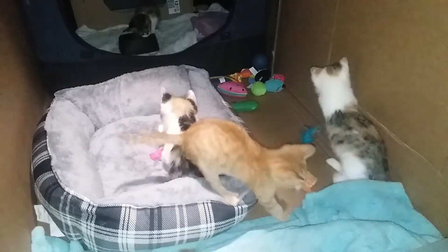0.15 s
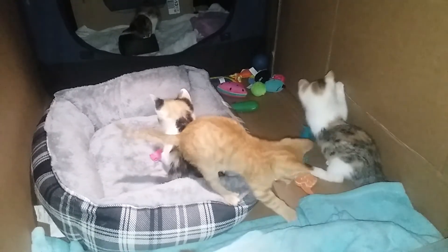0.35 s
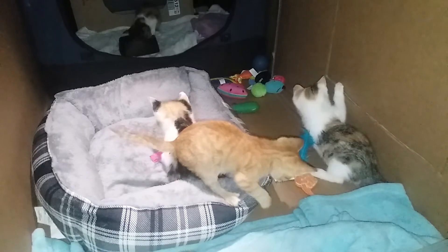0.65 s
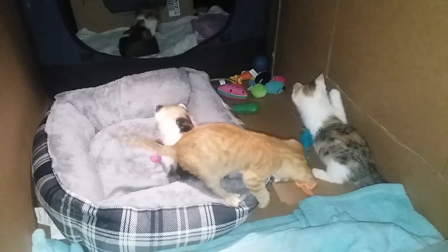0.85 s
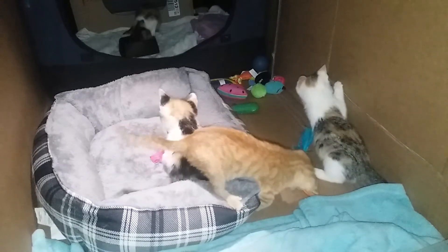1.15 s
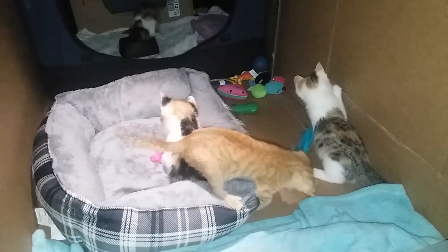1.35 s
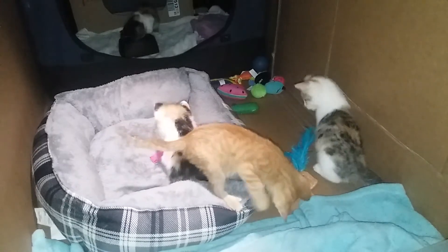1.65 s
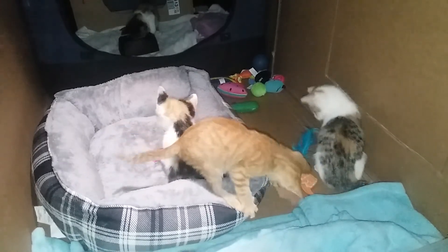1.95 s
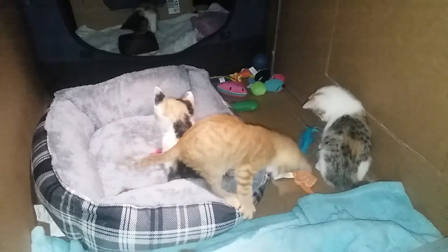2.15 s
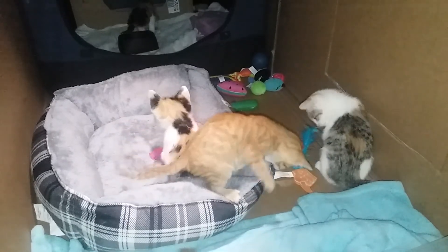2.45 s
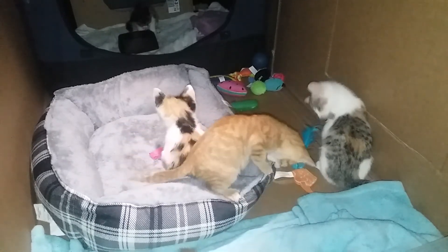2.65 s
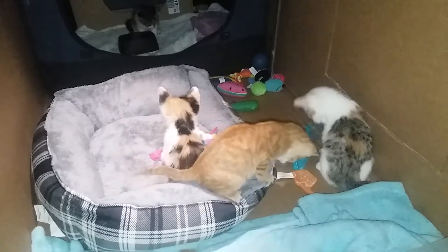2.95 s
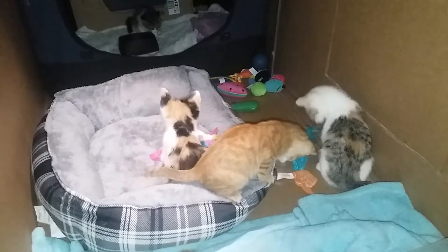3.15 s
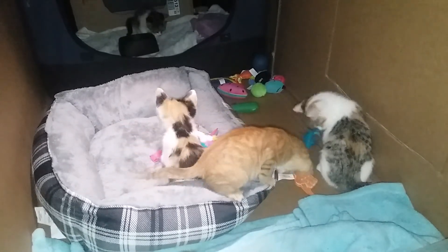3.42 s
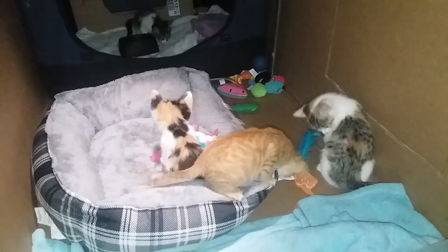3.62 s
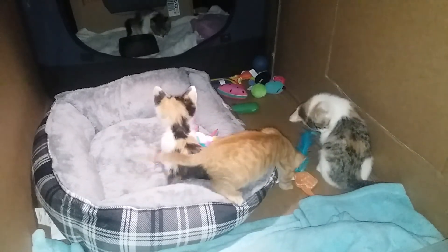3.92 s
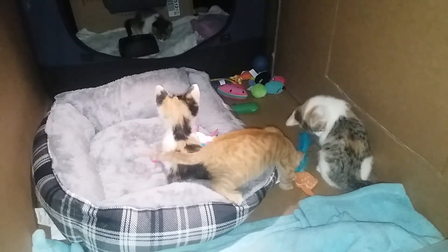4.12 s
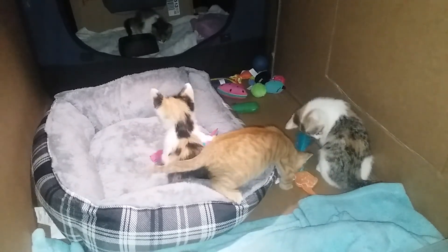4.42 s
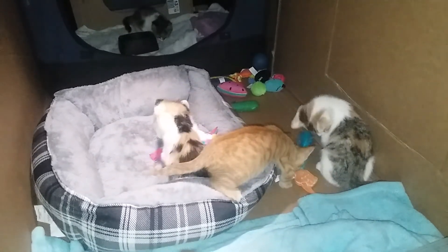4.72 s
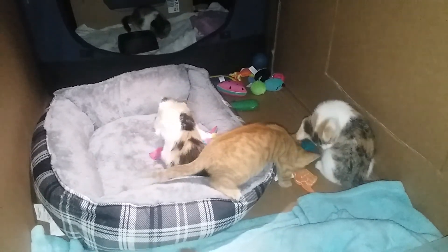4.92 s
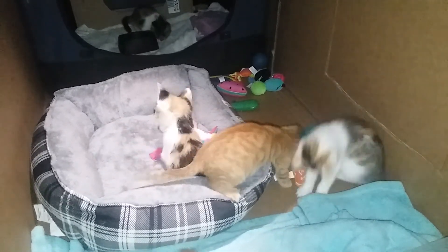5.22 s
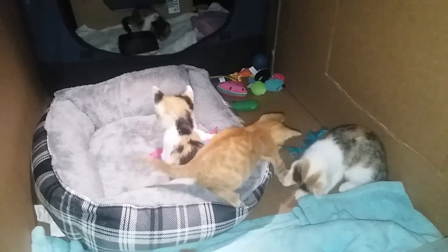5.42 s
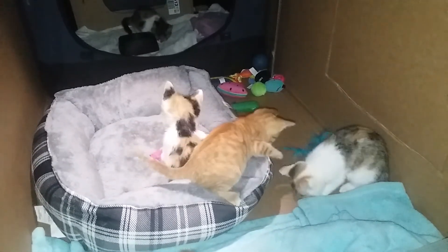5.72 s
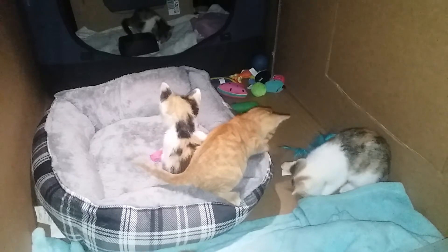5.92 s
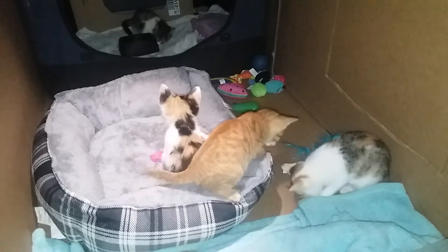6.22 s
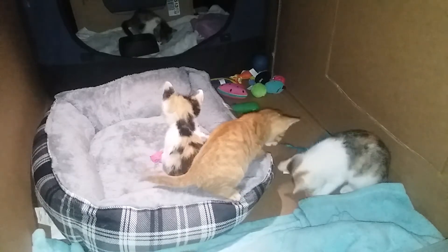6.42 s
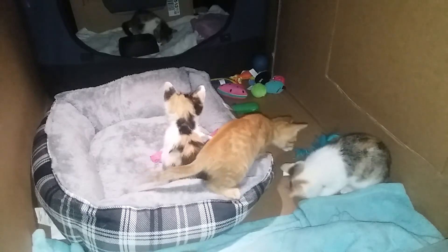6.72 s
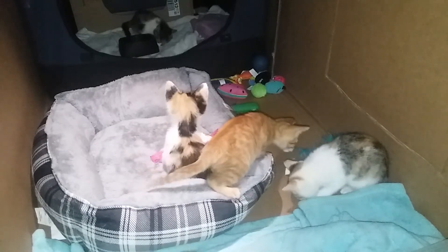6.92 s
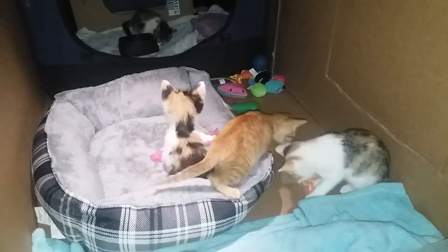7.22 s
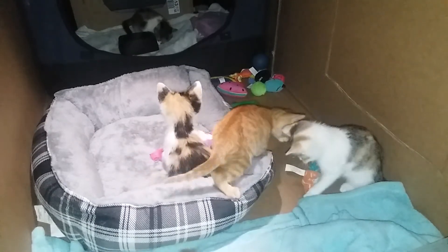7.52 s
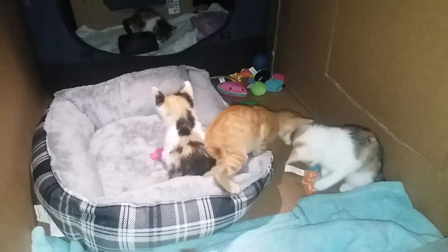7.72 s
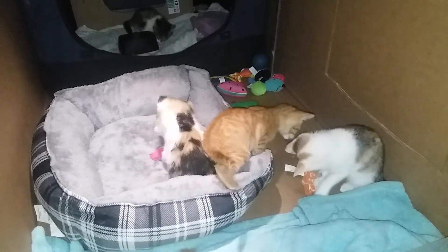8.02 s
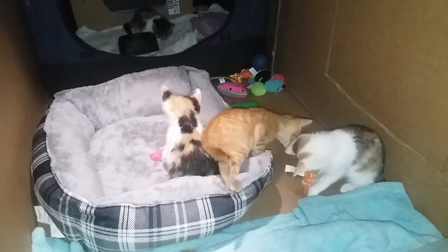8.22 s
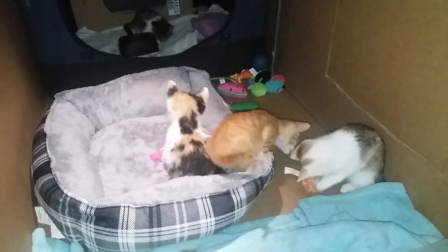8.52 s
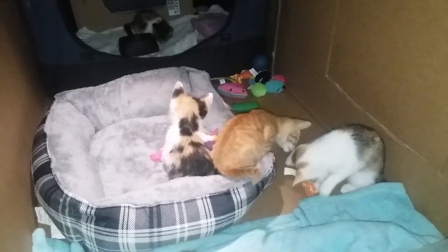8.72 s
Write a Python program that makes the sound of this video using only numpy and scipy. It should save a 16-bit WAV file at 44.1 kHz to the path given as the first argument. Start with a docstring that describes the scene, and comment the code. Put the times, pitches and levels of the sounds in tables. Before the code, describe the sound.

Close, sparse knocks and scratchy claw sounds on cardboard, with faint plush rustling between them, above a soft low motor hum.

```python
"""Kittens play in a cardboard box with a plush bed, close to a phone in a small, quiet room.
Throughout, motor and mains tones hum over rushing air, and chance touches tick. Early, paws strike the
panel into decaying oscillation and claws scrape by stick-slip; then fur brushes plush among lighter knocks.
From about 5 s bodies rub the cardboard, ticks cluster before 7 s, and firm thumps return after 7.7 s.
Box walls and room add brief reflections."""
import sys
import numpy as np
from scipy import signal
from scipy.fft import rfft, irfft, next_fast_len
from scipy.io import wavfile

SR = 44100
rng = np.random.default_rng(int(sys.argv[2]) if len(sys.argv) > 2 else 0)


def int16_out(signal):
    """Quantize to a 16-bit WAV file."""
    q = np.round(np.clip(np.atleast_2d(signal).T, -1, 1) * 32767)
    wavfile.write(sys.argv[1], SR, q.astype(np.int16))


N = 390726

# Levels are relative: the layers apply further gains, and each colour is normalised in power.
# hum lines of motor and mains [f/Hz, rms level/dB, waver/dB]
HUM_LINES = [(59.2, -74.5, 1), (71.2, -55.5, 0.4), (110.3, -62, 4), (117.4, -69, 2.5), (119.5, -59, 2),
             (160.8, -67, 4.5), (178.2, -74, 2), (237, -69.5, 3), (364, -81, 1), (417, -83, 4.5)]
# colour of the room's still air [f/Hz, level/dB]
AIR_COLOUR = [(20, -30), (42, -19), (60, -7.5), (90, 0.5), (125, -2), (230, -7.5), (400, -20), (600, -26.5),
              (900, -34), (2400, -37), (5000, -42.5), (10000, -44.5), (15500, -41.5)]
# fur strokes on the plush bed [t/s, length/s, level/dB]
BRUSH_STROKES = [(1.497, 0.25, -73), (1.798, 0.94, -74.5), (2.35, 0.59, -78.5), (2.768, 0.23, -74),
                 (5.4, 2.1, -78), (7.486, 0.92, -73.5), (8.04, 0.96, -71.5)]
# colour of the plush fibres [f/Hz, level/dB]
PLUSH_COLOUR = [(100, -44), (4000, -18), (6300, -8), (7800, 1.5), (9500, -12), (11500, -7), (16000, -3.5)]
# spells of bodies rubbing on cardboard, one curve each [t/s, paper hiss level/dB, panel flex level/dB]
RUB_CURVES = [
    [(0.31, -56.5, -71), (0.344, -60, -56), (0.445, -61, -65)],
    [(0.45, -70, -67), (0.506, -70.5, -74), (0.7, -88, -79)],
    [(5.116, -85, -83), (5.168, -66.5, -66), (5.24, -64.5, -68)],
    [(5.39, -74, -70), (5.66, -73.5, -73.5), (5.9, -75.5, -67), (6.064, -72.5, -63.5), (6.186, -67.5, -64),
     (6.296, -80, -72), (6.36, -73, -74)],
    [(6.42, -76.5, -77), (6.564, -85, -87), (6.854, -78, -80), (7.15, -84, -96)],
    [(7.26, -72, -90), (7.312, -69.5, -67.5), (7.432, -72.5, -62.5), (7.55, -72.5, -63.5), (7.68, -90, -90)],
    [(8.44, -83, -89), (8.575, -68.5, -80)],
]
# claw ticks on the toy and the floor [t/s, level/dB, snap level/dB]
TICK_EVENTS = [(0.146, -30, -16), (0.2935, -43, -7), (0.408, -28, -21), (0.458, -42.5, -20),
               (0.496, -54, -14), (1.0505, -59, -28), (1.4361, -48, -37), (1.511, -54.5, -43),
               (1.712, -60, -4), (2.1852, -47.5, -33), (3.3705, -62.5, -18), (4.322, -57, -15),
               (4.7185, -52.5, -35), (5.6326, -40.5, -16), (5.7069, -46.5, -17), (5.745, -55, -4),
               (6.128, -39.5, -19), (6.59, -45, -16), (6.612, -38, -20), (6.6311, -37, -23),
               (6.7953, -49.5, -10), (6.8212, -38.5, -13), (7.0362, -51, -3), (7.7076, -55.5, 0),
               (7.7222, -48.5, 0), (7.7462, -40, -1), (8.4248, -51.5, 8.5), (8.4452, -47.5, -34),
               (8.5791, -33.5, -11)]
# colour of a tick's body [f/Hz, level/dB]
TICK_BODY_COLOUR = [(100, -25), (1000, -20.5), (1650, -0.5), (2600, 4), (3500, -8), (4400, -3.5),
                    (5500, -8.5), (9000, -55), (16000, -43.5)]
# colour of a tick's sharp snap [f/Hz, level/dB]
TICK_SNAP_COLOUR = [(100, -48.5), (3000, -13), (5000, -6.5), (7400, -0.5), (9200, -18.5), (12000, -15),
                    (16000, -11.5)]
# claws dragged over cardboard [t/s, drag length/s, level/dB, brightness/(dB per octave), flex level/dB]
SCRAPE_EVENTS = [(0.1103, 0.013, -37, 3.5, -14), (0.138, 0.011, -26.5, 0.2, -15),
                 (0.39, 0.014, -48.5, -8, -5.5), (0.725, 0.021, -58.5, 4.5, -3.5),
                 (1.054, 0.026, -44.5, 0, -14), (1.125, 0.029, -53, 2.5, -4.5),
                 (1.269, 0.037, -64, 3.5, -9), (3.913, 0.0025, -45.5, 2, -8),
                 (3.937, 0.018, -53.5, 2.5, -4.5), (4.211, 0.055, -73.5, 4, -8),
                 (4.374, 0.032, -69, 0, -13), (5.113, .02, -58.5, 2.5, -7.5),
                 (5.249, 0.015, -37, -1.5, -3.5), (5.305, 0.053, -44.5, -0.5, 1),
                 (5.588, 0.02, -52.5, -8, -0.5), (5.909, 0.051, -66.5, -6.5, 2),
                 (6.121, 0.036, -53, -3, -1), (7.256, 0.0049, -57.5, 0, -10), (8.083, 0.023, -44, -3, -5.5),
                 (8.824, 0.022, -57.5, -4, 0)]
# colour of scraped cardboard [f/Hz, level/dB]
CARD_COLOUR = [(60, -20), (350, -11.5), (850, -13.5), (1150, -0.5), (1650, 2.5), (2700, 1), (3400, -5),
               (4500, -2.5), (6000, -10), (7700, -7.5), (9200, -30), (12000, -20), (16000, -26.5)]
# narrow resonances of scraped cardboard [f/Hz, width/Hz, level/dB]
CARD_RESONANCES = [(1216, 230, 3.7), (1680, 130, 4.2), (2680, 360, 3.1), (3770, 36, 2.3), (5480, 240, 6),
                   (7300, 60, 1.8)]
# colour of the flexing panel [f/Hz, level/dB]
FLEX_COLOUR = [(25, -16.5), (100, -5), (250, 1), (440, -0.5), (650, -8.5), (950, -3), (1400, -25),
               (2500, -27.5), (16000, -76)]
# paw thumps on the cardboard [t/s, level/dB, panel f/Hz, box ring level/dB, slap level/dB]
THUMP_EVENTS = [(0.1467, -29.5, 246, -15, -18), (0.151, -24.5, 133, -27, -26),
                (0.167, -31.5, 133, -10.5, -30), (0.2945, -13.5, 243, -30.5, -22.5),
                (0.332, -36, 223, -18, -15), (0.404, -32.5, 244, -13.5, -10.5),
                (1.051, -39.5, 240, -20, 2.5), (1.435, -47.5, 305, -6.5, -18), (1.912, -37, 261, -30, -25),
                (2.183, -40, 290, -11, -22.5), (3.916, -42, 272, -26, -19), (4.061, -40, 89, -43, -40),
                (5.24, -28, 290, -10.5, -7.5), (5.255, -40, 242, -4.5, -12), (5.601, -38.5, 217, -19, -8.5),
                (7.748, -21, 332, -18, -14), (8.083, -39.5, 274, -11, -2), (8.5803, -16.5, 344, -17.5, -8),
                (8.828, -40, 302, -6, -10.5)]
# colour of a pad slapping cardboard [f/Hz, level/dB]
SLAP_COLOUR = [(100, -8), (600, -12), (1000, 5.5), (1600, -10), (3000, -17.5), (7000, -21), (9200, -47),
               (16000, -31)]
# modes of the box [f/Hz, level/dB, t60/s]
BOX_MODES = [(149.5, -16.5, 0.29), (232, 3, 0.14), (367, 6.5, 0.029), (450, 0.5, 0.16), (539, -17, 0.32),
             (605, -9.5, 0.3), (785, -7, 0.15), (895, -15.5, 0.1), (1032, -2, 0.083), (1140, -15.5, 0.081),
             (1420, -28, .1)]
# difference of the two microphone ports, left minus right [f/Hz, level/dB]
PORT_DIFFERENCE = [(100, 1), (280, 0.5), (520, 4), (950, -3), (1500, -1.5), (2600, -3), (3300, -10),
                   (3700, -1.5), (5300, -2.5), (6200, -6), (7400, -5.5), (8500, 8.5), (12000, -1.5)]

TIME = np.arange(N) / SR
FREQ = np.maximum(np.arange(2049) * SR / 4096, 1)
SIGN = np.array([[1], [-1]])  # left, right
AIR_DB, TOP_HZ = -55.5, 15850
# lighter touches come by chance, between the listed ticks
TICK_T60_S, TOUCHES_PER_S, TOUCH_DB, TOUCH_SNAP_DB = 0.014, 2.2, -66.5, -6
# share of force at the catch, share of the drag spent building up, quick release, faint settling rustle
CATCH, BUILD_SHARE, RELEASE_T60_S, SETTLE_DB, SETTLE_T60_S = 0.51, 0.61, 0.11, -11, 0.31
# sparse larger slips during rubbing
CRACKS_PER_S, CRACK_DB = 53, -5
# swell time in panel periods for a firm thump; it doubles for each step down in level
FIRM_DB, FIRM_SWINGS, SOFTER_DB_PER_DOUBLING = -16, 0.41, 28


def undb(db):
    """Amplitude ratio of a level in decibels."""
    return 10 ** (np.asarray(db) / 20)


def unit(x):
    """Normalisation to rms 1."""
    return x / np.sqrt(np.mean(x ** 2))


def add(track, s, sound):
    """Superposition of a sound on a track from time s."""
    i = int(np.clip(s * SR, 0, N))
    track[..., i:i + sound.shape[-1]] += sound[..., :N - i]


def fade(t, t60):
    """Exponential decay, 60 dB down at t60."""
    return np.exp(-np.log(1000) * t / max(t60, 1 / SR))


def convolve(x, response):
    """Linear filtering: one or two channels convolved with an impulse response."""
    return signal.oaconvolve(np.atleast_2d(x), np.atleast_2d(response), axes=1)[:, :x.shape[-1]]


def spectrum(points, freq=FREQ):
    """Interpolation of (f/Hz, level/dB) points on a logarithmic frequency axis."""
    hz, db = np.transpose(points)
    return np.interp(np.log(freq), np.log(hz), db)


def tone(points, extra_db=0):
    """Spectral gains normalised so that white noise keeps its power."""
    return unit(undb(spectrum(points) + extra_db))


def colour(x, gain):
    """Minimum-phase filtering: a folded cepstrum makes the gains at FREQ causal."""
    cepstrum = irfft(np.log(gain))
    cepstrum[1:len(gain) - 1] *= 2
    cepstrum[len(gain):] = 0
    response = irfft(np.exp(rfft(cepstrum)))
    return convolve(x, response)


def diffuse(size, split_hz):
    """Diffuse-field coherence: noise alike at both ports in the bass, unrelated in the treble."""
    mid, side = rfft(rng.standard_normal((2, size)))
    freq = np.arange(len(mid)) * SR / size
    likeness = 1 / (1 + (freq / split_hz) ** 2)
    common = mid * np.sqrt((1 + likeness) / 2)
    opposed = SIGN * side * np.sqrt((1 - likeness) / 2)
    return irfft(common + opposed, size)


def walk(rate):
    """Slow random modulation: normal values, rate per second, joined by straight lines."""
    knots = rng.standard_normal(4096)
    return np.interp(TIME * rate, np.arange(len(knots)), knots)


def slips(rate, spread_db):
    """Stick-slip friction: random tiny clicks of uneven size, rate per second on average."""
    hit = rng.random(N) < rate / SR
    polarity = rng.choice([-1, 1], N)
    size = undb(spread_db * np.minimum(rng.exponential(size=N), 3))
    return unit(hit * polarity * size)


def place(sound, walls_db, walls_t60=0.041, lag_s=0.00029):
    """Early reflection and arrival delay: each spot has its own walls; the left port hears it later."""
    t = TIME[:2048]
    walls = diffuse(size=len(t), split_hz=600) * fade(t, walls_t60) * (t > 0.0004)
    response = undb(walls_db) * unit(walls) / np.sqrt(len(t))
    response[[0, 1], [int(lag_s * SR), 0]] += 1  # direct sound
    return convolve(sound, response / np.sqrt(1 + undb(2 * walls_db)))


def scatter(grains, count=2):
    """Distributed contact: slips shared among a few spots, each with its own reflections."""
    spot = rng.integers(count, size=len(grains))
    return sum(place(grains * (spot == k), walls_db=3.5, walls_t60=0.036) for k in range(count))


def paper(bright_db):
    """Resonant radiation of scraped cardboard, tilted by bright_db per octave."""
    rings = sum(db / (1 + (2 * (FREQ - hz) / width) ** 2) for hz, width, db in CARD_RESONANCES)
    octaves = np.log2(np.clip(FREQ, 600, 8000) / 2500)
    return tone(CARD_COLOUR, rings) * undb(bright_db * octaves)


def background():
    """Periodic and broadband noise: wavering hum lines over the low rush of the room."""
    out = np.zeros((2, N))
    for hz, db, waver_db in HUM_LINES:
        level = undb(db + waver_db * walk(rate=2.3))
        phase = 2 * np.pi * (hz * TIME + rng.random()) + 0.25 * waver_db * walk(rate=1.89)
        out += level * np.sqrt(2) * np.sin(phase)  # rms to peak
    return out + undb(AIR_DB) * colour(diffuse(size=N, split_hz=560), tone(AIR_COLOUR))


def echoes(x, room_db, room_t60, dull_hz):
    """Reverberation: a short, dull diffuse tail of the room builds up and decays around the box."""
    t = TIME[:SR // 2]
    room = diffuse(size=len(t), split_hz=1200) * fade(t, room_t60) * (1 - fade(t, 0.043))
    room = undb(room_db) * unit(room) / np.sqrt(len(t))
    dulling = signal.butter(1, dull_hz, fs=SR, output="sos")
    return convolve(x, signal.sosfilt(dulling, room))


def brushes():
    """Fibre friction: plush flicks past fur in soft, uneven strokes."""
    press = np.zeros(N)
    for s, length, db in BRUSH_STROKES:
        add(press, s, undb(db) * np.hanning(int(length * SR)))
    strokes = undb(3.8 * walk(rate=60))
    fibres = press * strokes * slips(rate=2700, spread_db=10)
    return colour(place(fibres, walls_db=2), tone(PLUSH_COLOUR))


def rubs(hiss_db=4, flex_db=3, bright_db=0.0, rough_db=3.5, uneven_db=2.0):
    """Sustained stick-slip: shifting bodies make sparser, drawn-out slips that hiss and flex the panel."""
    hiss, flex = np.zeros((2, N))
    for curve in RUB_CURVES:
        s, hiss_level, flex_level = np.transpose(curve)
        during = (TIME > s[0]) & (TIME < s[-1])
        hiss += during * undb(np.interp(TIME, s, hiss_level) + hiss_db)
        flex += during * undb(np.interp(TIME, s, flex_level) + flex_db)
    grip = undb(rough_db * walk(rate=160) + uneven_db * walk(rate=39))
    rubbing = unit(slips(rate=1600, spread_db=4.5) * grip)
    cracks = undb(CRACK_DB) * slips(rate=CRACKS_PER_S, spread_db=2.5)
    grains = scatter(rubbing + cracks, count=3)
    return colour(hiss * grains, paper(bright_db)) + colour(flex * grains, tone(FLEX_COLOUR))


def ticks(body_db=-2.0, snap_db=4.5):
    """Impact excitation: a landing claw tip gives a brief decaying burst, with a bright snap when sharp."""
    t = TIME[:SR // 10]
    out = np.zeros((2, N))
    # one chance touch at a random moment of each interval
    touches = [((k + when) / TOUCHES_PER_S, TOUCH_DB, TOUCH_SNAP_DB)
               for k, when in enumerate(rng.random(size=40))]
    for s, db, sharp_db in list(TICK_EVENTS) + touches:
        body = undb(body_db) * tone(TICK_BODY_COLOUR)
        snap = undb(sharp_db + snap_db) * tone(TICK_SNAP_COLOUR)
        burst = rng.standard_normal(len(t)) * fade(t, TICK_T60_S)
        tick = colour(burst, np.hypot(body, snap))
        add(out, s, undb(db) * place(tick, walls_db=0.5, walls_t60=0.057))
    return out


def scrapes(paper_db=-2.5, flex_gain_db=2.5, rough_db=2.16):
    """Stick-slip: a claw catches, drags harder and lets go; slips hiss in the paper and flex the panel."""
    out = np.zeros((2, N))
    t = TIME[:SR // 2]
    grains = unit(slips(rate=5000, spread_db=3) * undb(rough_db * walk(rate=230)))
    for s, length, db, bright_db, flex_db in SCRAPE_EVENTS:
        build = np.minimum(CATCH + (1 - CATCH) * t / (BUILD_SHARE * length), 1)
        after = np.maximum(t - length, 0)
        release = np.hypot(fade(after, RELEASE_T60_S), undb(SETTLE_DB) * fade(after, SETTLE_T60_S))
        drag = undb(db) * build * release
        start = rng.integers(N - len(t))
        contact = scatter(drag * grains[start:start + len(t)])
        hiss = undb(paper_db) * paper(bright_db)
        flex = undb(flex_db + flex_gain_db) * tone(FLEX_COLOUR)
        add(out, s, colour(contact, np.hypot(hiss, flex)))
    return out


def thumps(ring_gain_db=-5.0, flutter_db=0.0, flutter_t60=0.13, left_db=-0.5):
    """Modal excitation: a paw swings the panel briefly, slaps its face and rings the box."""
    t = TIME[:SR // 4]
    out = np.zeros((2, N))
    ring = sum(undb(db) * fade(t, t60) * np.sin(2 * np.pi * hz * t) for hz, db, t60 in BOX_MODES)
    for s, db, hz, ring_db, slap_db in THUMP_EVENTS:
        flutter_noise, slap_noise = rng.standard_normal((2, len(t)))
        # softer paws press for longer
        swell = FIRM_SWINGS / hz * 2 ** ((FIRM_DB - db) / SOFTER_DB_PER_DOUBLING)
        swing = t / swell * np.exp(1 - t / swell) * np.sin(2 * np.pi * hz * t)
        # many weaker modes blur into a noisy flutter behind the clear ones
        flutter = colour(flutter_noise * fade(t, flutter_t60), tone(FLEX_COLOUR))
        box = undb(ring_gain_db) * ring + undb(flutter_db) * flutter
        slap = colour(slap_noise * fade(t, 0.03), tone(SLAP_COLOUR))
        add(out, s, undb(db) * place(swing, walls_db=-9.5, walls_t60=0.027, lag_s=0.00015))
        add(out, s, undb(db + ring_db) * place(box, walls_db=-9.5, lag_s=0.00027))
        add(out, s, undb(db + slap_db) * place(slap, walls_db=-1.5))
    # a small panel radiates little deep bass
    radiation = signal.butter(2, 60, "high", fs=SR, output="sos")
    return signal.sosfilt(radiation, out) * undb(-0.5 + SIGN * left_db / 2)


def scene():
    """Superposition: play and its room echo, shaded differently at the two ports, over the hum."""
    claws = scrapes() + rubs() + ticks() + brushes()
    thud = thumps()
    # the floor of the box sends less into the room than its walls do
    into_room = claws + undb(-3.5) * thud
    play = claws + thud + echoes(into_room, room_db=-11.0, room_t60=0.27, dull_hz=3500)
    size = next_fast_len(N, real=True)
    freq = np.maximum(np.arange(size // 2 + 1) * SR / size, 1)
    shade = undb(SIGN * spectrum(PORT_DIFFERENCE, freq) / 2)
    return irfft(rfft(play, size) * shade, size)[:, :N] + background()


def record(dry):
    """Band limiting: the phone cuts steeply above TOP_HZ."""
    return signal.sosfilt(signal.ellip(10, 0.2, 70, TOP_HZ, fs=SR, output="sos"), dry)


dry = scene()
out = record(dry)
int16_out(out)
```